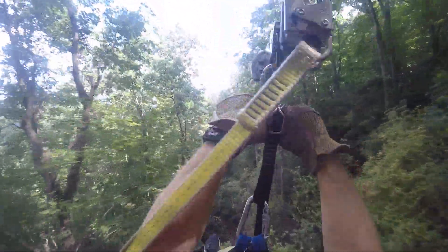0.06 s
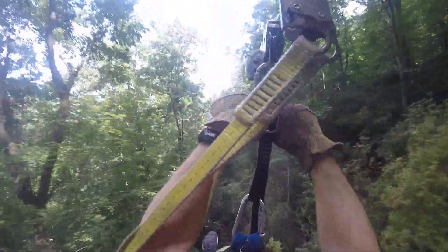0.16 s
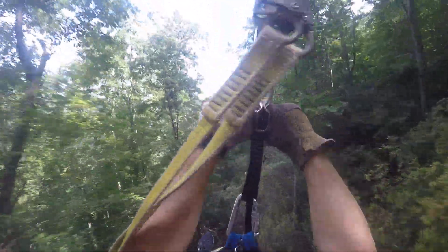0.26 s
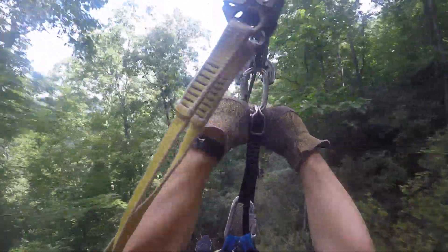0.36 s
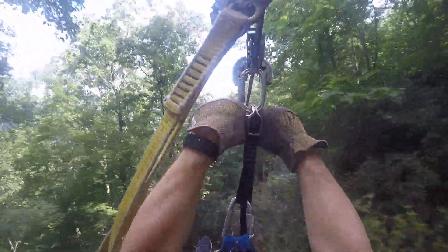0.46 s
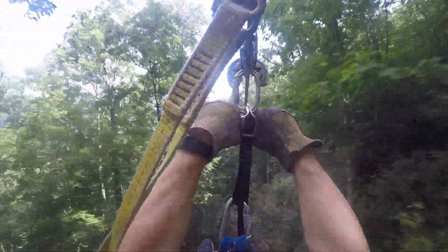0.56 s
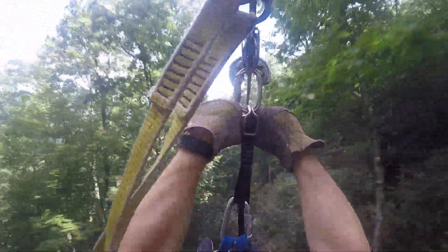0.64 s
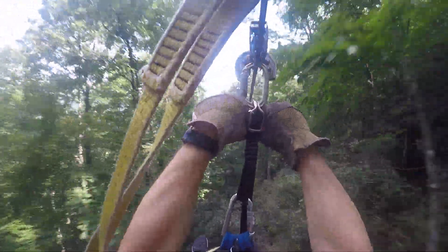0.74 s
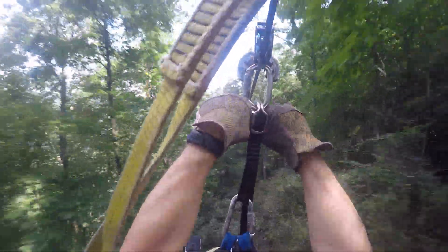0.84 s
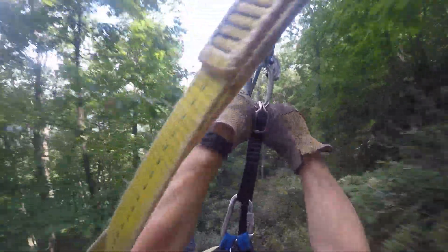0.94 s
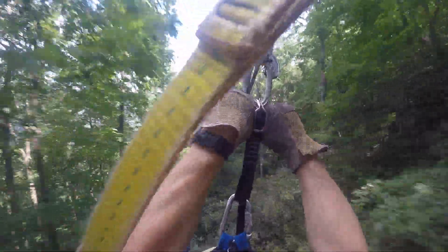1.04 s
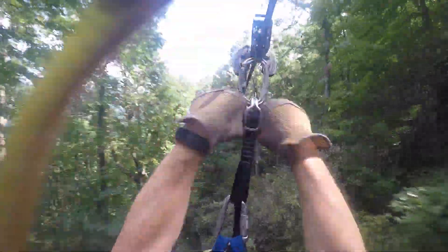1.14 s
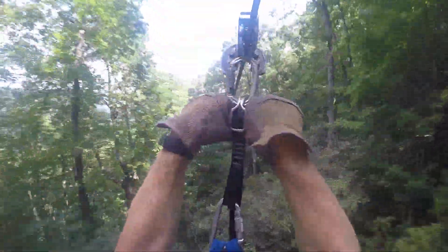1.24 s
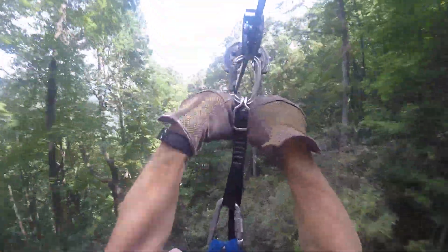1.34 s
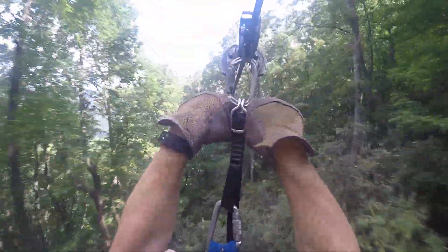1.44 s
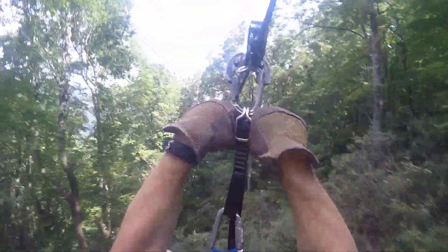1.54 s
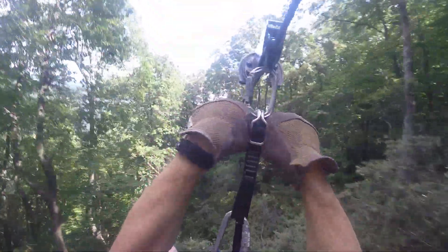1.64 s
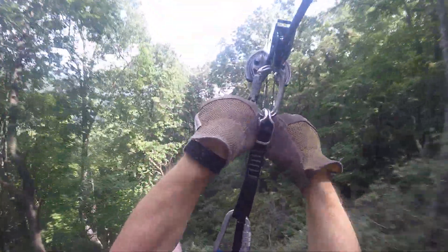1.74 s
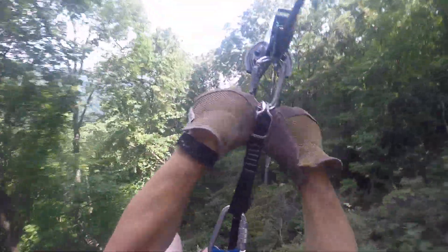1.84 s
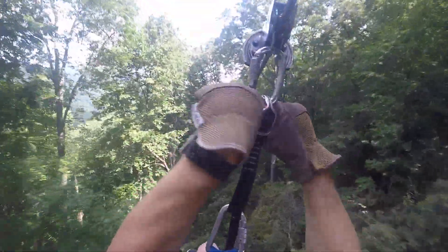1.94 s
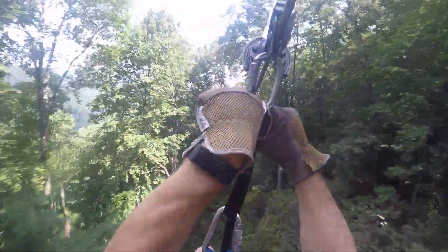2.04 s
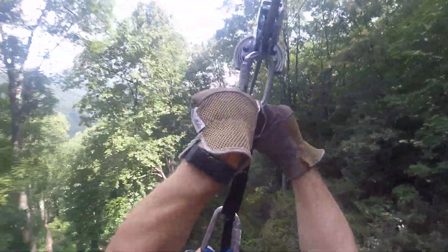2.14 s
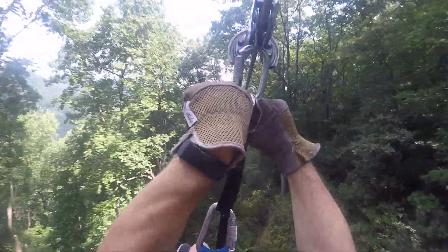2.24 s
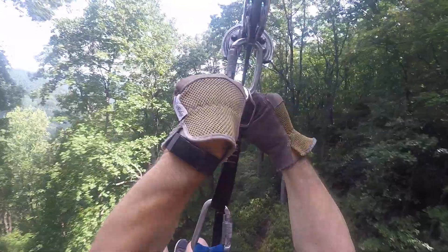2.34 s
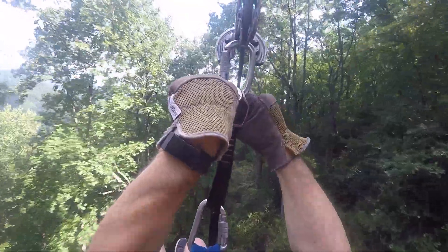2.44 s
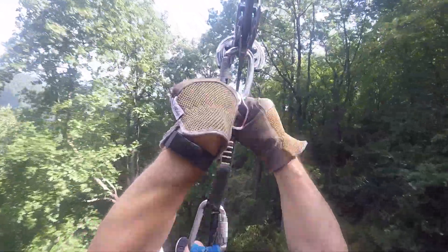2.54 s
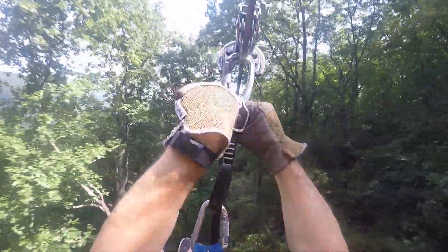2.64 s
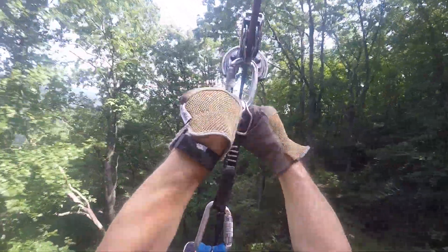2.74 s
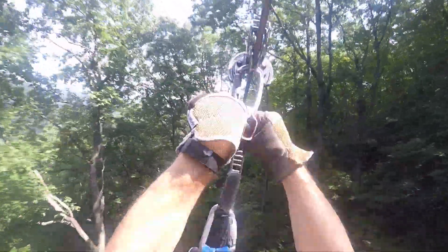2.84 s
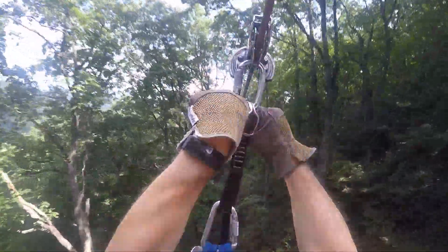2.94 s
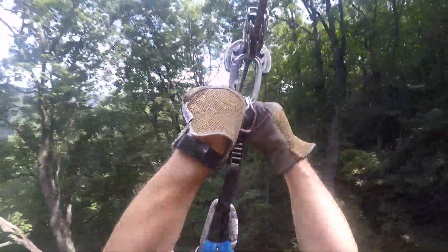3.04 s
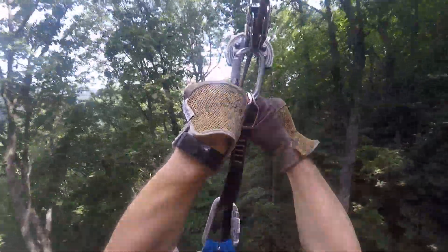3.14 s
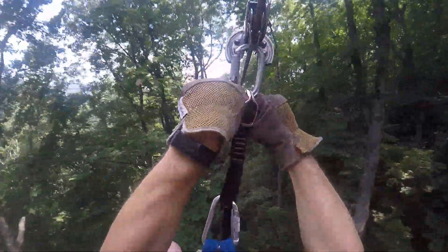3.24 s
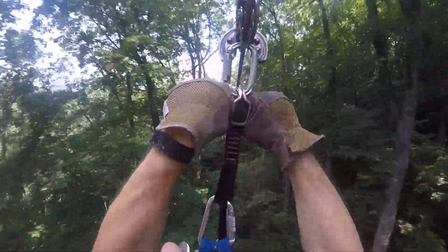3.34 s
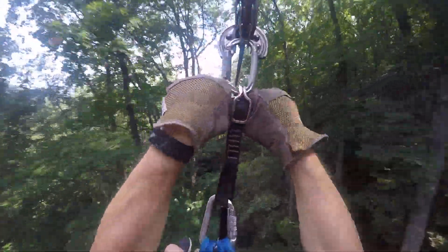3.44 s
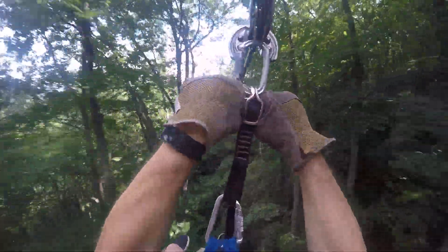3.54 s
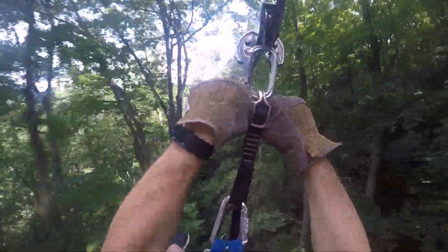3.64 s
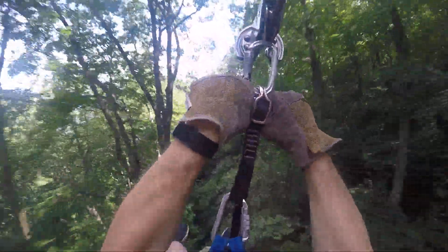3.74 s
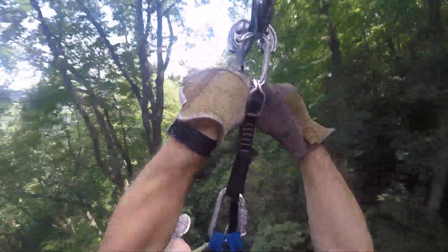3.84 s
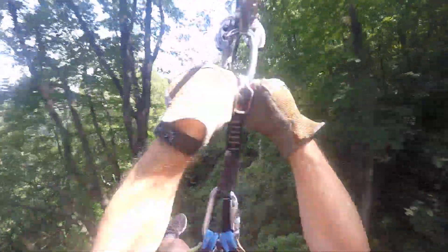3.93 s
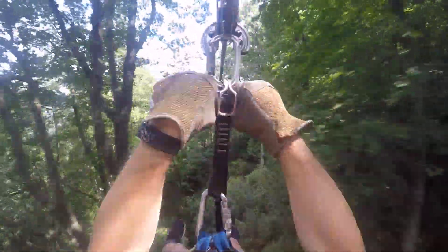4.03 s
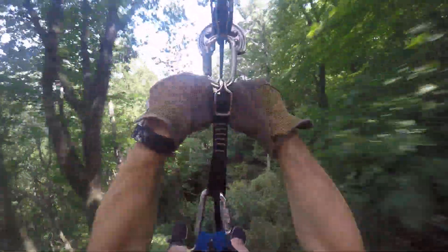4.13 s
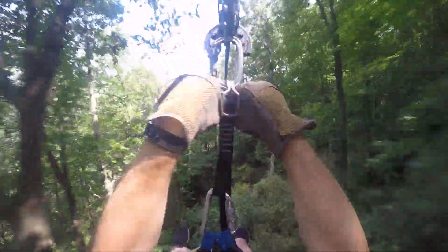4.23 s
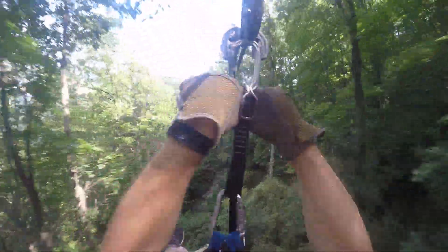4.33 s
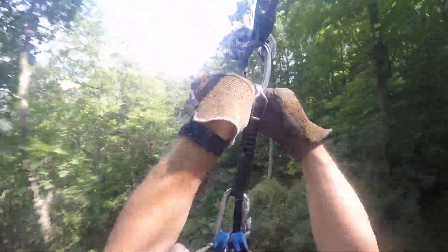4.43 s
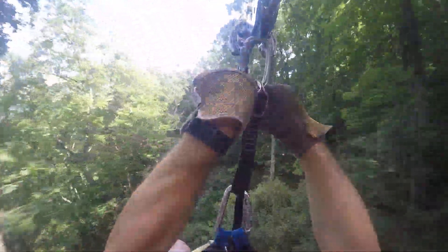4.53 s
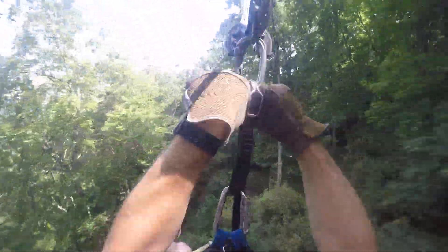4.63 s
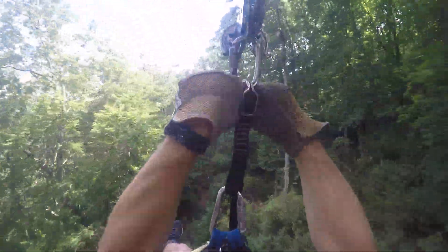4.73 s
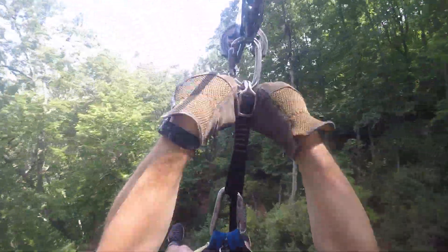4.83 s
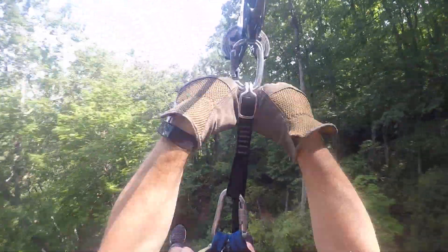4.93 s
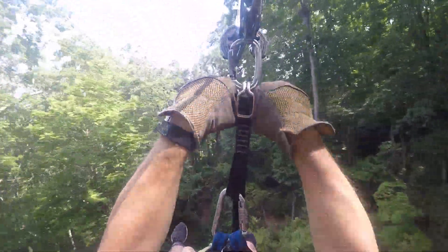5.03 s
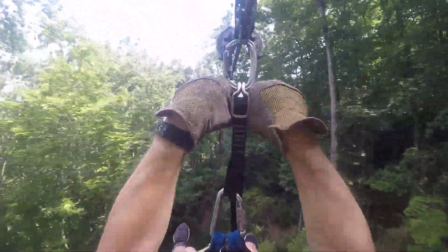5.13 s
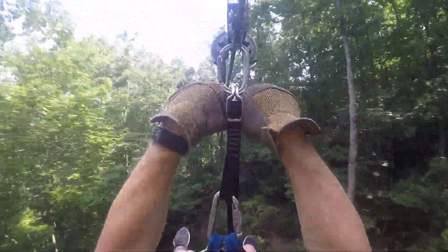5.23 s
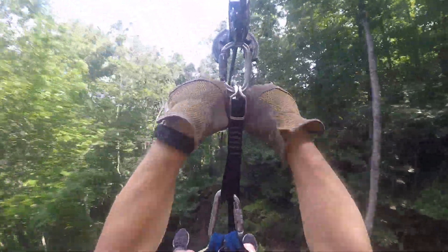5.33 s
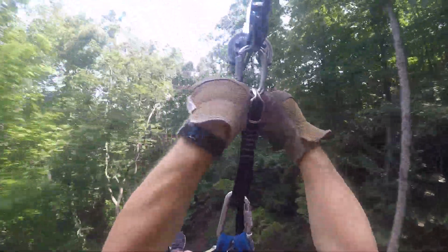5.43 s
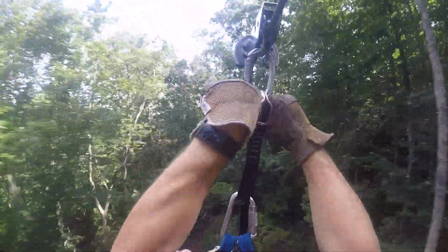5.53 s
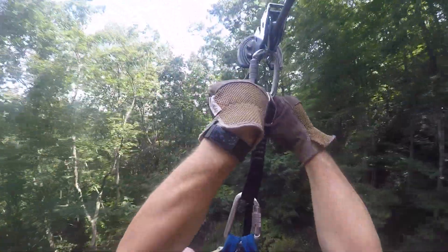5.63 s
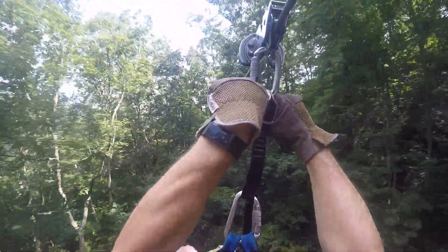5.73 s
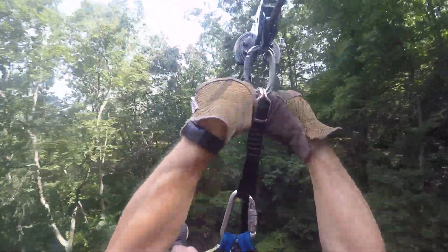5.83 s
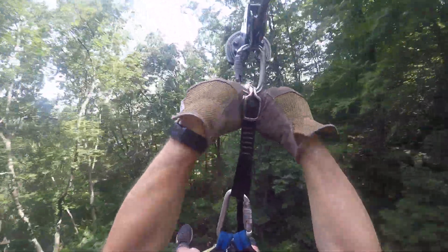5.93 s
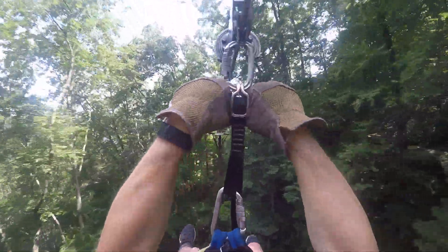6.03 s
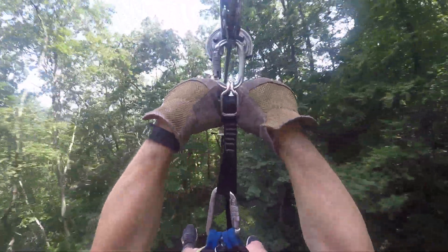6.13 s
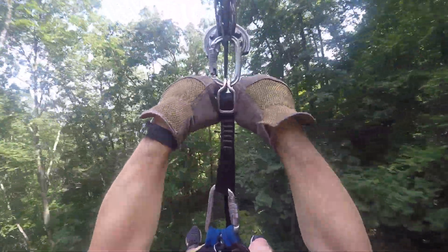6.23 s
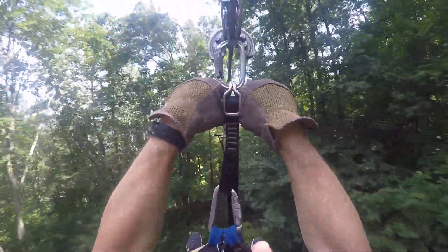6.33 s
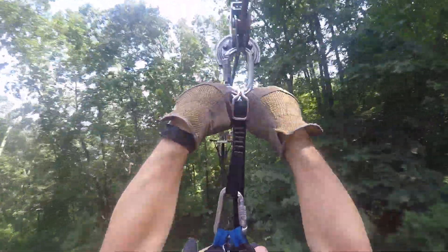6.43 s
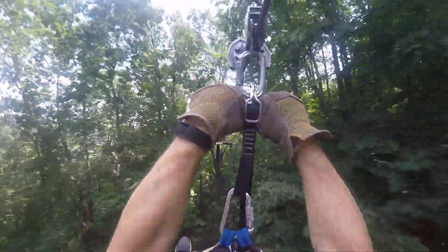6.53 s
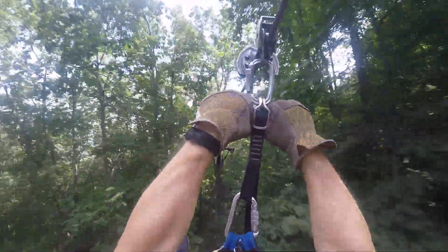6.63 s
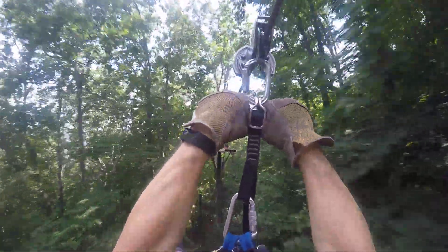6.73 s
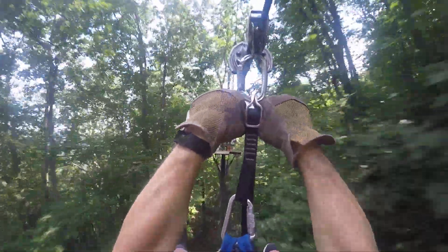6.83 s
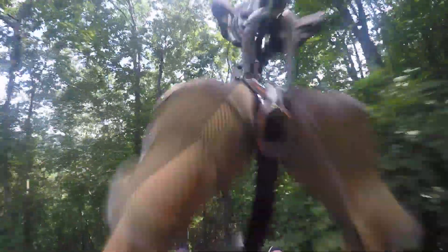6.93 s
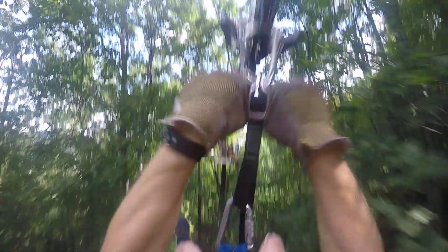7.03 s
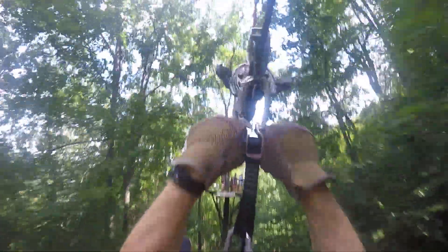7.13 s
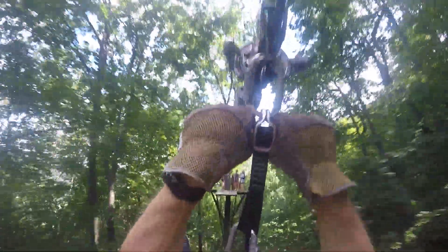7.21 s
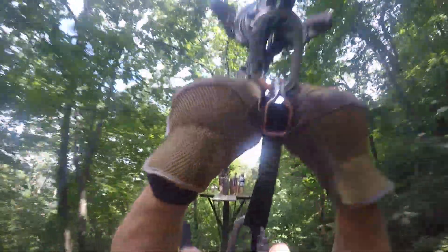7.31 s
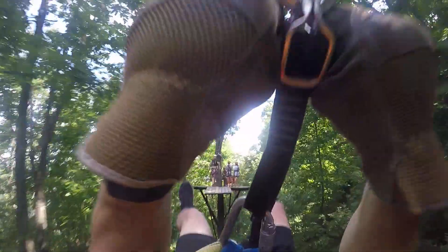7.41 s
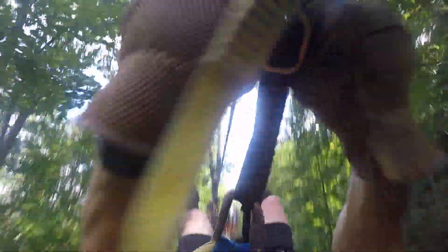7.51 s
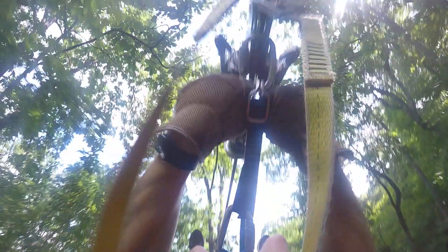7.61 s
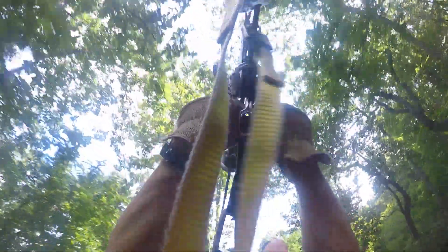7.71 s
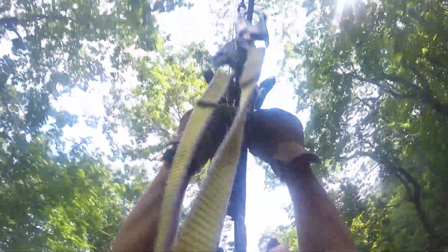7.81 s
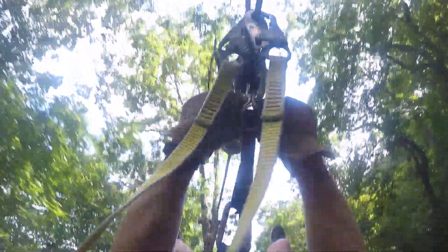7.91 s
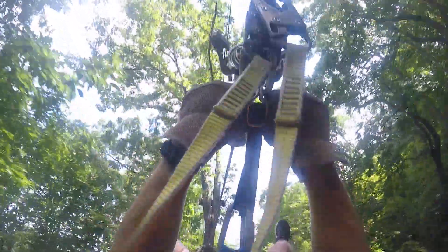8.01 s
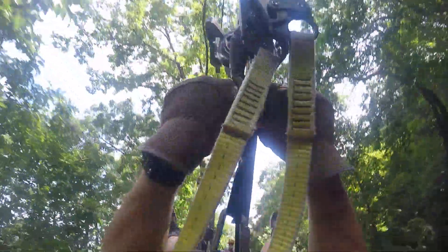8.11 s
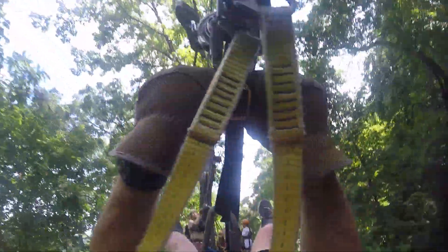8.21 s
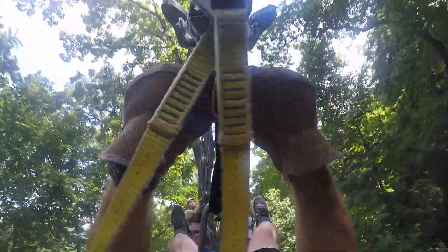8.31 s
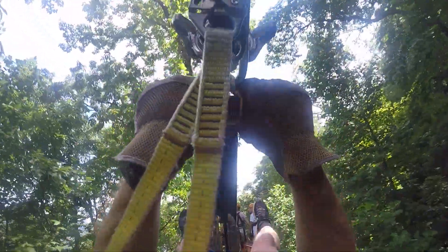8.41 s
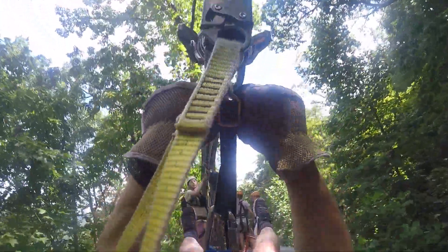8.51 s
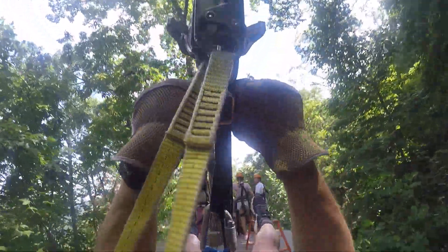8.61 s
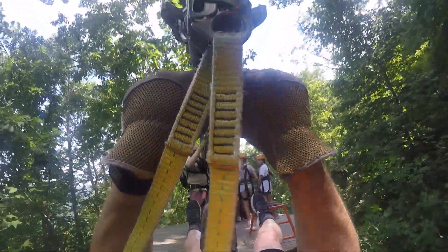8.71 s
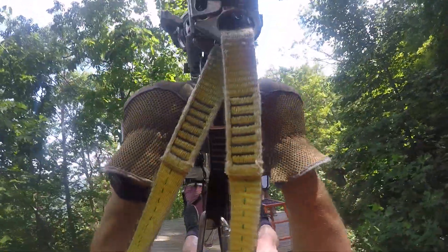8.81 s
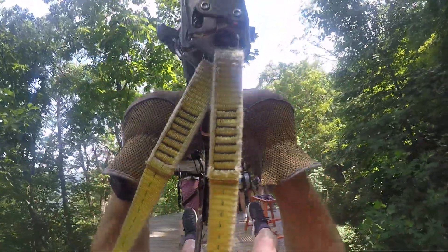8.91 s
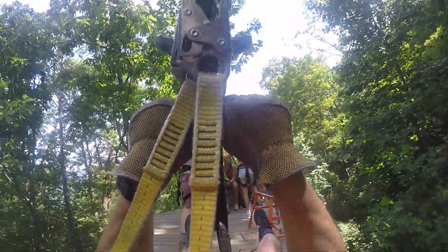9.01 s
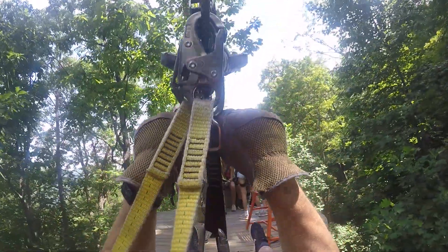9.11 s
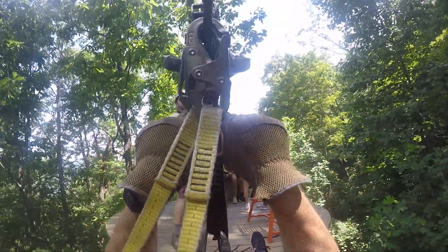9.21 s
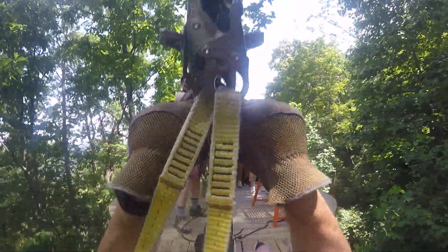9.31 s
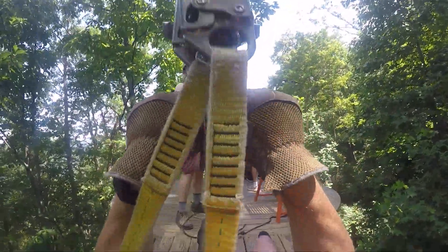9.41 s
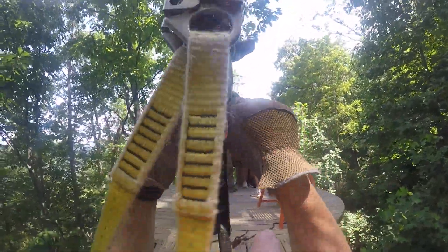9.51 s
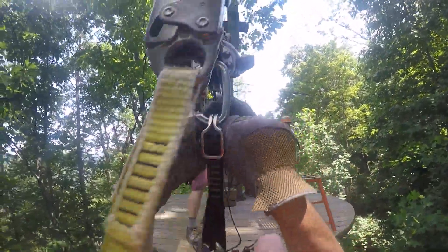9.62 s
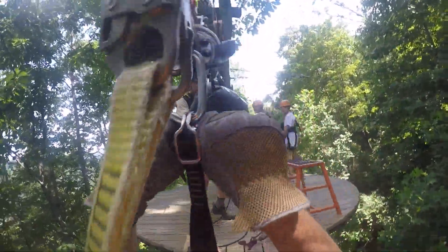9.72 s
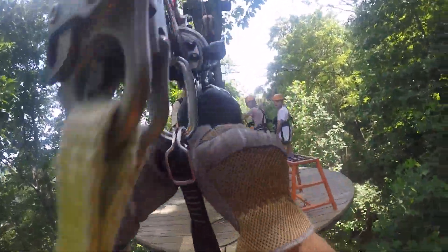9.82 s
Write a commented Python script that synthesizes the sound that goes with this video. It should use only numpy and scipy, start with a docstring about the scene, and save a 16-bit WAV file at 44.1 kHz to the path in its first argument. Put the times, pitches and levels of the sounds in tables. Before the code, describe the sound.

A zipline trolley whines and hisses along a steel cable under rumbling wind, then slams into a brake and grinds down with metallic clicks and knocks.

```python
"""A zipline trolley runs down a twisted steel cable through a forest, heard from the rider's helmet camera.
From the start its wheels whine over the strands and the scrape of rolling rings the frame, as filtered noise;
wind rumbles on the microphone over a faint forest bed. Near 7 s the wheels lurch, with clinks and knocks.
At 7.57 s the trolley meets the brake block: the frame clangs, the whine drops in level and falls in pitch.
It pushes the block as it slows; hardware chatters and jolts shake the camera housing at the platform."""
import sys
import numpy as np
from scipy import signal
from scipy.fft import rfft, irfft
from scipy.io import wavfile
from scipy.ndimage import uniform_filter1d

SR = 44100
rng = np.random.default_rng(int(sys.argv[2]) if len(sys.argv) > 2 else 0)


def file_out(sig):
    """Save sig as 16-bit WAV at sys.argv[1]."""
    # one column per channel
    cols = np.atleast_2d(sig).T
    # limit, then scale
    lim = np.clip(cols, -1, 1)
    pcm = np.round(lim * 32767).astype(np.int16)
    wavfile.write(sys.argv[1], SR, pcm)


N = 434826
TIME = np.arange(N) / SR
LURCH_S, BLOCK_MET_S = 7.0, 7.57


def from_db(db):
    """Decibels to gain."""
    return 10 ** (np.asarray(db) / 20)


def rms_one(x):
    """Scale to unit rms."""
    return x / np.sqrt(np.mean(np.square(x)) + 1e-20)


def in_time(rows):
    """Each column of a curve table, interpolated at every sample."""
    s, *columns = np.transpose(rows)
    return [np.interp(TIME, s, column) for column in columns]


def ramp(start_s, length_s):
    """Straight rise from 0 to 1."""
    return np.clip((TIME - start_s) / length_s, 0, 1)


def drift(rate_hz):
    """Slow random wander with unit rms: noise through a two-pole lowpass."""
    step = 20  # samples between drift values
    settle = 2000  # drift values discarded
    pole = np.exp(-2 * np.pi * rate_hz * step / SR)
    noise = rng.standard_normal(N // step + settle + 2)
    slow = signal.lfilter([1], [1, -2 * pole, pole ** 2], noise)[settle:]
    return np.interp(np.arange(N) / step, np.arange(len(slow)), rms_one(slow))


def coloured(spectrum):
    """Unit-rms noise shaped to a spectrum, interpolated over log frequency."""
    hz, db = np.transpose(spectrum)
    bins_hz = np.maximum(np.arange(N // 2 + 1) * SR / N, 1)
    gain = from_db(np.interp(np.log(bins_hz), np.log(hz), db))
    return rms_one(irfft(rfft(rng.standard_normal(N)) * gain, N))


def resonate(x, hz, width_hz):
    """One two-pole resonance with gain 1 at its top."""
    r = np.exp(-np.pi * width_hz / SR)
    feed = np.array([1, 0, -1]) * (1 - r * r) / 2
    return signal.lfilter(feed, [1, -2 * r * np.cos(2 * np.pi * hz / SR), r * r], x)


def add(out, s, sound):
    """Mix a sound in at a time."""
    at = int(s * SR)
    out[at:at + len(sound)] += sound[:max(N - at, 0)]


# strands passed per second, running free: time_s, pitch_hz
FREE_RUN = [(0.02, 841.5), (1.12, 968.3), (1.22, 960), (1.89, 1036), (1.95, 1028), (2.07, 1088),
            (2.37, 1040), (2.6, 1080), (3.28, 1108), (3.45, 1086), (3.63, 1132), (3.85, 1123), (3.97, 1154),
            (4.15, 1120), (4.38, 1164), (4.62, 1141), (4.9, 1145), (5.15, 1168), (5.6, 1149), (5.9, 1136),
            (6.04, 1139), (6.68, 1129), (6.94, 1100)]
# same, through the lurch before the block: time_s, pitch_hz
LURCH_RUN = [(7.005, 1060), (7.075, 1289), (7.12, 1198), (7.19, 943), (7.279, 988), (7.35, 844), (7.5, 790)]


def strand_rate():
    """Wheel speed as strands per second: free run, then even slowing to a crawl behind the block."""
    slowing_hz_per_s, crawl_hz = 465, 117
    free_hz, = in_time(list(FREE_RUN) + list(LURCH_RUN))
    return np.maximum(free_hz - slowing_hz_per_s * np.maximum(TIME - BLOCK_MET_S, 0), crawl_hz)


# rolling contact force, running free: time_s, force_db
FREE_FORCE = [(0, -14), (.31, -8.5), (1.0, -1), (1.98, 0.5), (2.15, -2), (2.55, 0.5), (2.88, -4),
              (3.5, -0.5), (6.93, -0.5), (7.07, -3), (7.22, -7.5), (7.52, 0.5)]
# same, pushing the block: time_s, force_db
PUSH_FORCE = [(7.585, -10), (7.8, -8.5), (8.07, -7), (8.46, 1.5), (8.97, -2), (9.2, -5.5), (9.7, -27),
              (9.86, -25)]


def contact_force_db():
    """Force of wheel on cable, which drives the frame throughout and the whine until the block."""
    force_db, = in_time(list(FREE_FORCE) + list(PUSH_FORCE))
    return force_db


def swell(s, length_s):
    """Rise, hold and let go, from 0 to 1."""
    attack_s, release_s = 0.045, 0.04
    return np.interp(TIME, [s - attack_s, s, s + length_s, s + length_s + release_s], [0, 1, 1, 0])


# resonances the partials sweep through: centre_hz, width_hz, peak_db
WHINE_RESONANCES = [(1060, 145, -37), (1300, 1300, -43.5), (2034, 510, -41), (2283, 76, -34),
                    (2660, 196, -23.5), (2897, 86, -24.5), (3265, 196, -24), (3438, 126, -27),
                    (3710, 88, -19), (3840, 347, -17), (4410, 69, -29), (4650, 890, -32), (5124, 150, -29),
                    (5433, 350, -26.5)]
# whine partials, lowest first: smear (ratio, before the lurch), free_db, lurched_db
WHINE_PARTIALS = [(0.089, -1.5, 0), (0.3, 0, -8), (0.23, 3.5, -5.5), (0.24, -2, -6), (0.59, 1.5, -6)]
# wheels bite, level of the whine shifts: start_s, length_s, overtones_db (before share), fundamental_db
BITES = [(0.947, 0.13, 0.5, 1.5), (1.292, 0.31, 1, 2.5), (2.006, 0.1, 8, 6), (2.165, 0.57, 1, 5.5),
         (2.703, 0.56, 8, 5), (3.57, 0.8, 7.5, 0), (4.43, 0.42, 6, 4.5), (4.99, 0.51, 3, 4.5),
         (5.54, 0.24, 7, 1.5), (5.867, 0.073, 4, -2), (6.202, 0.2, -2, 7.5), (7.027, .015, 13, 5),
         (7.096, 0.023, 13.5, -5), (7.25, 0.051, 6, 6), (7.356, .14, -2, 5), (7.9, .42, 11, 3)]
# share of the overtone shift, second partial upward: share (ratio)
OVERTONE_SHARES = (1, 0.74, 0.36, 0.49)
# wheels skip, mostly dips in the whine: start_s, length_s, change_db
WHEEL_SKIPS = [(1.2, .035, -0.5), (1.673, 0.089, -1), (2.522, 0.062, -2.5), (3.364, 0.093, 1),
               (4.169, .03, -5), (4.9, 0.018, -4), (6.043, 0.014, 2.5), (6.552, .04, -7), (6.74, 0.032, -2),
               (6.967, 0.026, -11)]


def whine(pitch_hz, force_db, braked):
    """Wheels bump over uneven strands: jittery, smeared harmonics swell through resonances, rougher once lurched."""
    jitter, skid_jitter, skid_smear = 0.00283, 0.0083, 1.9  # pitch ratio, pitch ratio, added smear ratio
    flutter_db, waver_db, blur_hz = 1.0, 1.35, 20
    pushed_db = -19
    stutter_from_s, stutter_db, stutter_hz = 5.95, 3.5, 7.9
    stop_s, fade_s = 9, 0.56

    lurched = ramp(LURCH_S, 0.044)
    uneven = 1 + jitter * drift(18.43) + skid_jitter * lurched * drift(70)
    phase = 2 * np.pi * np.cumsum(pitch_hz * uneven) / SR

    skips_db = sum(db * swell(s, length_s) for s, length_s, db in WHEEL_SKIPS)
    pressure_db = (1 - braked) * force_db + braked * pushed_db + skips_db + flutter_db * drift(6.3)

    # overtones stutter late in the free run
    stuttering = ramp(stutter_from_s, 0.097) * (1 - lurched)
    overtones_db = stutter_db * stuttering * (drift(stutter_hz) - 0.6)
    overtones_db = overtones_db + sum(db * swell(s, length_s) for s, length_s, db, _ in BITES)
    fundamental_db = sum(db * swell(s, length_s) for s, length_s, _, db in BITES)
    bites_db = [fundamental_db] + [share * overtones_db for share in OVERTONE_SHARES]

    out = np.zeros(N)
    for k, ((smear, free_db, lurched_db), bite_db) in enumerate(zip(WHINE_PARTIALS, bites_db), 1):
        power = np.zeros(N)
        for hz, width_hz, peak_db in WHINE_RESONANCES:
            power += (from_db(peak_db) / (1 + (2 * (k * pitch_hz - hz) / width_hz) ** 2)) ** 2
        response = np.sqrt(power)
        wobble = (drift(blur_hz * k) + 1j * drift(blur_hz * k)) / np.sqrt(2)
        shiver = 1 + smear * (1 + skid_smear * lurched) * wobble
        partial = rms_one(np.real(shiver * np.exp(1j * k * phase)))
        partial_db = (1 - lurched) * free_db + lurched * lurched_db
        level_db = pressure_db + bite_db + partial_db + waver_db * drift(4.1)
        out += response * from_db(level_db) * partial
    return out * np.clip((stop_s - TIME) / fade_s, 0, 1)


# trolley frame and cable modes, before force and treble: centre_hz, width_hz, free_db, pushed_db
FRAME_MODES = [(1070, 380, -44.5, -52), (1477, 390, -43.5, -48), (1753, 134, -47.5, -46.5),
               (2088, 225, -40, -51.5), (2380, 220, -35.5, -36.5), (2582, 144, -36, -47),
               (2856, 260, -31.5, -44), (3393, 470, -24, -31), (3733, 305, -23, -30),
               (4585, 790, -29.5, -40), (5450, 370, -28, -45), (5870, 440, -46, -41.5),
               (6470, 600, -36.5, -49), (7165, 720, -27.5, -37.5), (7670, 350, -31.5, -60),
               (8610, 550, -41, -46), (9210, 1300, -39.5, -44), (10100, 13000, -38, -41.5),
               (12870, 650, -44.5, -42), (14800, 1300, -49.5, -47)]
# added to modes above 5.8 up to 10 kHz, running free: time_s, change_db
HISS_CURVE = [(.4, 4.5), (1.45, 4), (2.2, 1), (3.45, 2), (3.9, -1), (4.2, 2.5), (4.6, -1), (5.3, 4),
              (5.65, -0.5), (6.4, 5), (6.9, 3), (7.12, 1), (7.5, -3)]
# added to modes above 10 kHz, running free: time_s, change_db
FIZZ_CURVE = [(.5, 2.5), (1.95, .5), (2.55, 5.5), (3.4, 1), (6.9, -1), (7.0, 2), (7.25, 0), (7.5, 7)]
# pitches the frame hardly radiates: centre_hz, width_hz
FRAME_NULLS = [(3060, 36), (3580, 123)]


def rolling(pitch_hz, force_db, braked):
    """Rough steel on steel: grainy noise rings the frame modes, with more treble at speed."""
    grain_db, flicker_db, patchy_db = 0.5, 0.5, 1.66
    full_speed_hz, treble_from_hz = 1130, 3500
    brighten_db = 4.66  # treble slope per octave, gained per doubling of speed
    grind_db, grind_from_s, grind_below_hz = 3.5, 7.15, 2500

    (hiss_db,), (fizz_db,) = in_time(HISS_CURVE), in_time(FIZZ_CURVE)
    slope_db = brighten_db * np.log2(pitch_hz / full_speed_hz)
    contact = rms_one(from_db(grain_db * drift(330) + flicker_db * drift(17.5)))
    # low modes grind as the block comes up
    low_grind_db = grind_db * ramp(grind_from_s, 0.16)

    out = np.zeros(N)
    for hz, width_hz, free_db, pushed_db in FRAME_MODES:
        treble_db = (0, hiss_db, fizz_db)[np.searchsorted((5800, 10000), hz)]
        running_db = free_db + treble_db + low_grind_db * (hz < grind_below_hz)
        speed_db = slope_db * max(np.log2(hz / treble_from_hz), 0)
        mode_db = (1 - braked) * running_db + braked * pushed_db + speed_db
        scrape = contact * rng.standard_normal(N)
        tone = resonate(resonate(scrape, hz, width_hz), hz, width_hz)
        out += from_db(force_db + mode_db + patchy_db * drift(3.1)) * rms_one(tone)
    for hz, width_hz in FRAME_NULLS:
        out = out - resonate(out, hz, width_hz)
    return out


# air on the microphone: time_s, level_db
WIND_CURVE = [(0, -31.5), (.6, -19.5), (1.6, -14), (2.2, -16), (3.15, -17), (4.0, -15.5), (7.1, -14.5),
              (7.25, -23.5), (7.52, -21), (7.72, -35), (8.8, -35.5), (9.15, -30), (9.5, -21), (9.86, -28)]
# wind colour at speed: freq_hz, density_db (per Hz, relative)
BUFFET_SPECTRUM = [(8, -4.5), (20, -12), (33, 3.5), (62, -1), (98, 2.5), (140, -10.5), (200, -19),
                   (300, -23), (400, -33.5), (600, -38), (900, -45), (2000, -70)]
# wind colour behind the block, rider only sways: freq_hz, density_db (per Hz, relative)
SWAY_SPECTRUM = [(8, 0), (22, 2), (40, -17), (60, -9.5), (90, -11.5), (140, -30.5), (300, -39), (700, -64),
                 (2000, -66)]


def wind(braked):
    """Lumpy pressure on the port as low noise; eddies puff up its higher part until the block."""
    lump_db, eddy_db, eddy_hz = 0.42, 1.5, 150
    level_db, = in_time(WIND_CURVE)
    high = signal.butter(2, eddy_hz, "high", fs=SR, output="sos")
    low = signal.butter(2, eddy_hz, "low", fs=SR, output="sos")
    puffs = signal.sosfilt(high, coloured(BUFFET_SPECTRUM)) * rms_one(from_db(eddy_db * drift(36)))
    rumble = signal.sosfilt(low, coloured(BUFFET_SPECTRUM))
    gusts = rms_one((rumble + puffs) * from_db(lump_db * drift(15)))
    return from_db(level_db) * ((1 - braked) * gusts + braked * coloured(SWAY_SPECTRUM))


# forest colour: freq_hz, density_db (per Hz, relative)
FOREST_SPECTRUM = [(60, -2), (150, 12.5), (300, 3), (600, -0.5), (1000, -3), (3000, -14), (16000, -40)]


def forest():
    """Steady faint background of shaped noise."""
    level_db = -58.5
    return from_db(level_db) * coloured(FOREST_SPECTRUM)


def blows(table, modes, crack_db, low_hz, top_hz, tail_db, tail_t60_s):
    """Dying chatter of contacts: a bare crack plus modes set ringing; hard touches favour the high ones."""
    tilt_about_hz = 3500
    out, t = np.zeros(N), TIME[:SR // 4]
    radiated = signal.butter(2, [low_hz, top_hz], "band", fs=SR, output="sos")
    for s, level_db, t60_s, tilt_db in table:
        crack, *mode_noises = rng.standard_normal((len(modes) + 1, len(t)))
        force = from_db(-60 * t / t60_s) + from_db(tail_db - 60 * t / tail_t60_s)
        blow = from_db(crack_db + tilt_db) * rms_one(force * crack)
        # each mode is rung by its own noise, so their skirts do not add up in step
        for (hz, mode_db, ring_t60_s), noise in zip(modes, mode_noises):
            width_hz = np.log(1000) / np.pi / ring_t60_s
            ringing = rms_one(resonate(force * noise, hz, width_hz))
            blow = blow + from_db(mode_db + tilt_db * np.log2(hz / tilt_about_hz)) * ringing
        blow = signal.sosfilt(radiated, blow)
        # level is set by the loudest 128 samples
        loudest = np.sqrt(uniform_filter1d(blow ** 2, size=128).max())
        add(out, s, from_db(level_db) * blow / loudest)
    return out


# hardware clinks: start_s, level_db, rattle_t60_s, tilt_db (per octave)
CLINK_BLOWS = [(6.962, -9.5, 0.023, 12), (6.966, -5, 0.027, 0), (6.978, -30, 0.018, -1),
               (8.841, -21, 0.034, -2), (9.087, -20.5, 0.032, -1), (9.105, -29, .015, 19),
               (9.186, -27, .02, 5), (9.209, -31, 0.014, 10), (9.2515, -14.5, 0.04, -9),
               (9.267, -19, 0.028, 8), (9.279, -16, 0.062, -9), (9.291, -13, 0.037, -8),
               (9.297, -12.5, 0.0059, 10), (9.300, -17, 0.044, -4), (9.313, -22, .012, 10),
               (9.354, -26, 0.038, 6), (9.408, -22.5, 0.021, 4), (9.440, -22.5, 0.029, 4),
               (9.516, -28, 0.033, -13), (9.5285, -8, 0.036, -5), (9.536, -22, 0.065, -18),
               (9.614, -43, 0.035, 12)]
# hardware modes, before tilt: freq_hz, level_db (relative), ring_t60_s
STEEL_MODES = [(1154, -11, 0.011), (1600, -5, 0.018), (2360, 2, 0.06), (2695, 3.5, 0.0099),
               (3450, 15, 0.01), (3675, 9, 0.021), (4400, -11, .008), (5530, 0, 0.0045),
               (6900, -3.5, 0.009), (9100, -18, .008), (12600, -11, .005)]


def clinks():
    """Steel hardware touching: blows on mostly high modes."""
    return blows(CLINK_BLOWS, STEEL_MODES, crack_db=2, low_hz=900, top_hz=7940,
                 tail_db=-26, tail_t60_s=0.35)


# dull knocks of block and rigging: start_s, level_db, rattle_t60_s, tilt_db (per octave)
KNOCK_BLOWS = [(6.963, -13, 0.034, -1.5), (7.054, -18, 0.028, 2), (7.5285, -7, 0.031, 5.5),
               (7.5395, -12, 0.036, -7.5), (7.5595, -3.5, 0.012, 6), (7.565, -3.5, 0.031, 6.5),
               (7.795, -25.5, 0.051, 1), (7.92, -40, 0.18, -21), (9.294, -22.5, 0.085, 0),
               (9.588, -22.5, 0.081, -4.5), (9.622, -32.5, 0.052, -1), (9.808, -26.5, 0.081, -4.5),
               (9.84, -35, 0.22, -2)]
# block and rigging modes, before tilt: freq_hz, level_db (relative), ring_t60_s
BLOCK_MODES = [(282.7, 4, 0.045), (583, 2.5, 0.0038), (1077, 12, 0.0026), (1865, 8, 0.0083),
               (2350, 4.5, 0.017)]


def knocks():
    """Block and rigging struck: blows on lower modes."""
    return blows(KNOCK_BLOWS, BLOCK_MODES, crack_db=-1, low_hz=120, top_hz=5100,
                 tail_db=-37, tail_t60_s=0.19)


# jerks through the harness: start_s, level_db (before boost_db), freq_hz, t60_s
JOLT_EVENTS = [(7.074, -12.5, 64, 0.17), (7.532, 7, 111, 0.029), (7.5634, 1.5, 72, 0.065),
               (7.798, -32.5, 110.8, 0.12), (9.303, -14.5, 91.5, 0.056), (9.549, -10.5, 32, 0.18),
               (9.5918, -3.5, 89.6, 0.099), (9.817, -9, 95, 0.11)]


def jolts():
    """A jerk through the harness rocks the camera housing: a soft-started, decaying low sine."""
    rise_s, boost_db = 0.0016, 5.0
    out, t = np.zeros(N), TIME[:SR // 4]
    onset = 1 - np.exp(-(t / rise_s) ** 2)
    for s, level_db, hz, t60_s in JOLT_EVENTS:
        decay = from_db(level_db + boost_db - 60 * t / t60_s)
        add(out, s, decay * onset * np.sin(2 * np.pi * hz * t))
    return out


def clang():
    """One mode of the trolley frame, struck by the brake block: a decaying sine."""
    freq_hz, level_db, t60_s = 2250, -26.5, 0.38
    out, t = np.zeros(N), TIME[:SR // 2]
    add(out, BLOCK_MET_S, from_db(level_db - 60 * t / t60_s) * np.sin(2 * np.pi * freq_hz * t))
    return out


def scene():
    """Everything reaches one microphone, so both channels are alike."""
    braked = ramp(BLOCK_MET_S, 0.025)
    pitch_hz, force_db = strand_rate(), contact_force_db()
    trolley = whine(pitch_hz, force_db, braked) + rolling(pitch_hz, force_db, braked)
    air = wind(braked) + forest()
    impacts = clinks() + knocks() + jolts() + clang()
    mono = trolley + air + impacts
    return np.array([mono, mono])


def record(dry):
    """The loudest peaks are flattened and the top is cut."""
    ceiling, knee, cutoff_hz = 0.84, 8, 15250
    limited = ceiling * dry / (ceiling ** knee + dry ** knee) ** (1 / knee)
    lowpass = signal.ellip(12, 0.1, 80, cutoff_hz, fs=SR, output="sos")
    return signal.sosfilt(lowpass, limited)


dry = scene()
out = record(dry)
file_out(out)
```